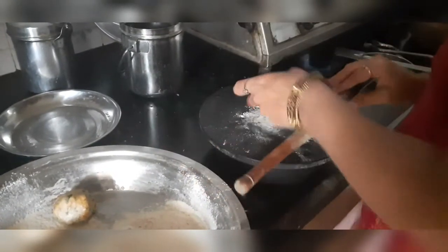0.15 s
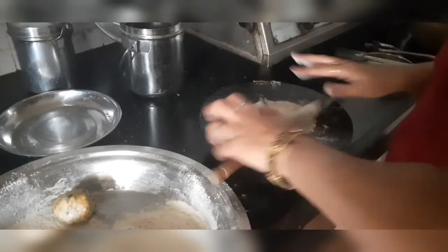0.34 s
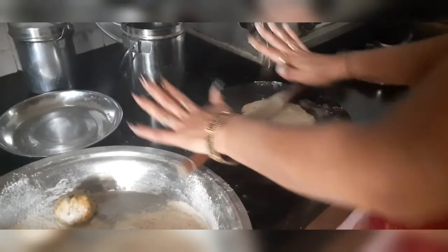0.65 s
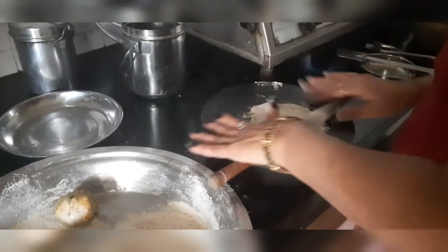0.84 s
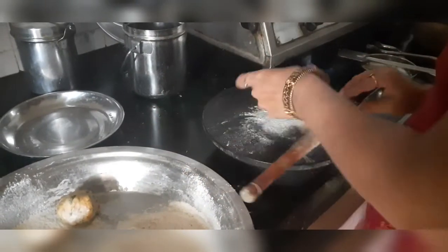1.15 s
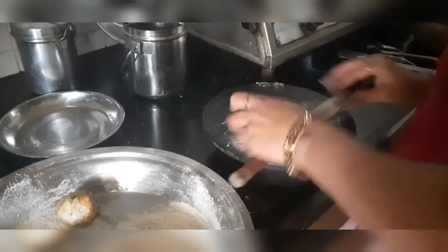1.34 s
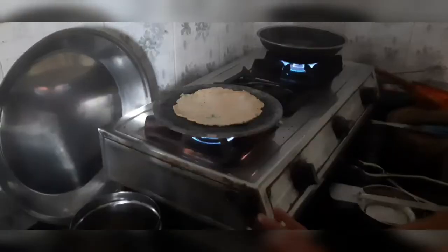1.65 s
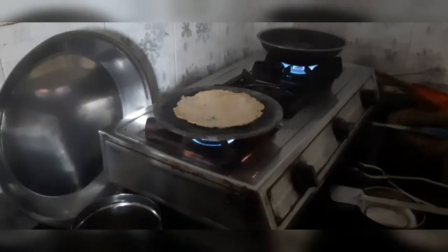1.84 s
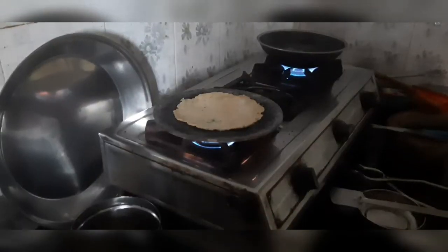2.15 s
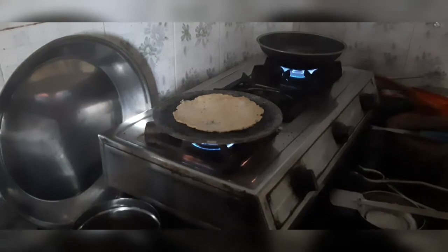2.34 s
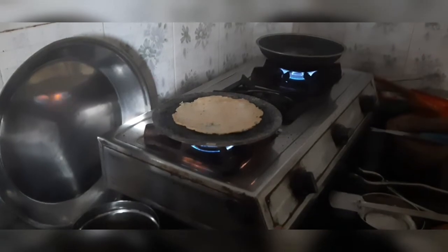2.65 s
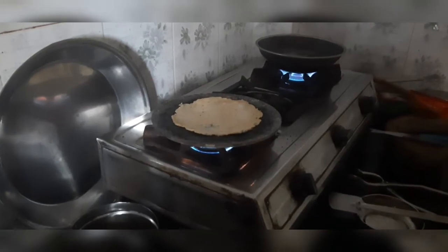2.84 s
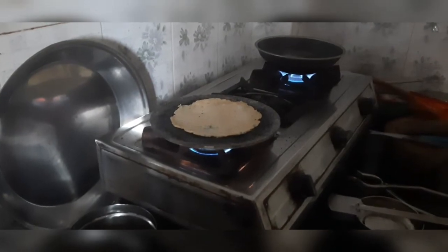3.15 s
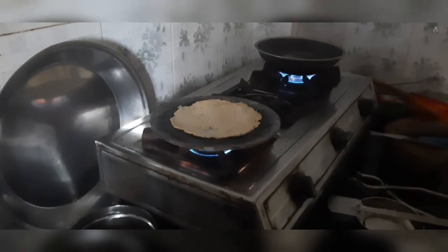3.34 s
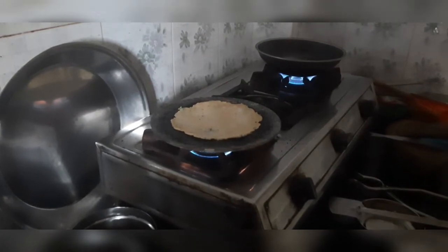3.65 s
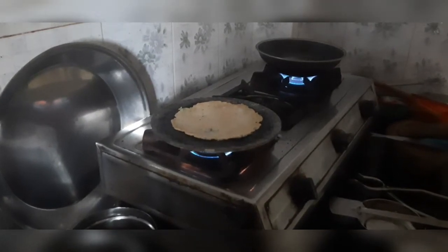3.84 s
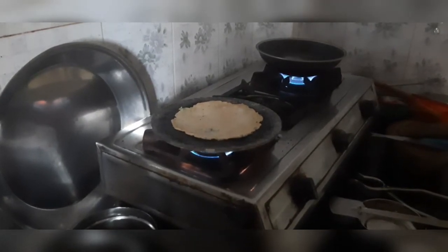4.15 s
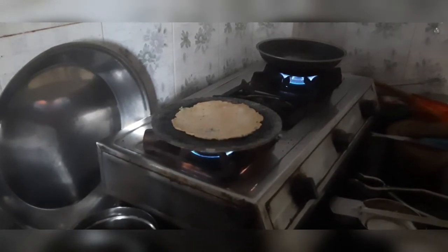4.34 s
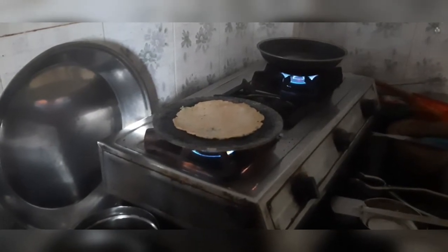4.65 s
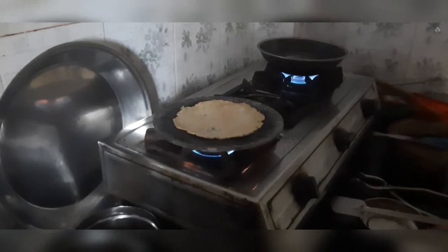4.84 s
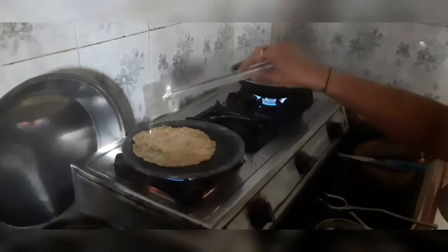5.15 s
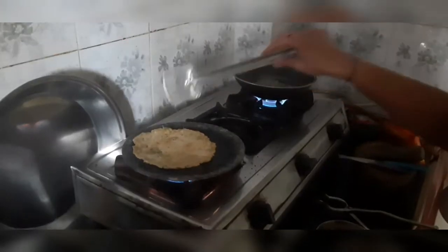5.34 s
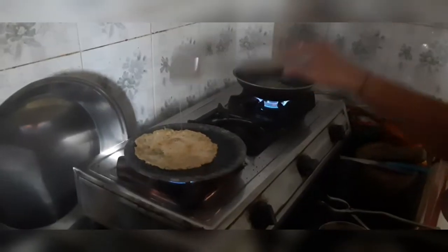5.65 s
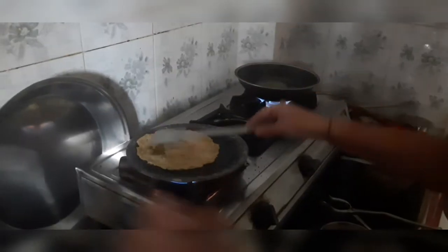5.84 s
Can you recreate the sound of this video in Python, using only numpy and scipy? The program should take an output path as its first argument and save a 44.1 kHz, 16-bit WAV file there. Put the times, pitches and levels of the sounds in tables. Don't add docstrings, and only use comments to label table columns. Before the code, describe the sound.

A small tiled kitchen, heard close on a modest stereo microphone with short hard echoes. From 0 to 1.4 seconds a wooden rolling pin works on a board: low lumpy rumbles, firm knocks at about 0.25 and 0.33, faint axle squeaks, a delicate bangle tick at 0.8, and a quick woody clatter at 1.3. Sound stops dead for a moment, then returns around 1.47 with gas burner hiss and a low flame boom that slowly strengthen. The pin lands heavily on the counter near 1.9 in several tight contacts, a sharp knock follows at 2.4, and a loud bunched clatter at 3.46. Around 4.4 come a low rumble and light taps, then a rough dragging rub from 4.55 to 4.85 and dry bumps by 4.9. Another tiny silence near 4.95; steady hiss resumes. At 5.4 tongs clang on an iron pan, rattling and ringing briefly; small ticks and a last gas puff end it.

```python
import sys
import numpy as np
from scipy import signal
from scipy.fft import rfft, irfft, next_fast_len
from scipy.io import wavfile

SR = 44100
rng = np.random.default_rng(int(sys.argv[2]) if len(sys.argv) > 2 else 0)


def magnitude_from_level(level_db):
    exponent = np.asarray(level_db, float) / 20
    return 10 ** exponent


def master_out(mix):
    frames = np.transpose(np.atleast_2d(mix))
    ceiling = np.clip(frames, -1, 1)
    pcm = np.round(ceiling * 32767).astype(np.int16)
    wavfile.write(sys.argv[1], SR, pcm)


N = 264144
CONTROL_STEP = 40


def rms_one(x):
    return x / np.sqrt(np.mean(x ** 2) + 1e-20)


def lookup(rows, hz, count=1):
    rows = np.array(rows, float)
    return np.interp(np.log(hz), np.log(np.maximum(rows[:, 0], 1)), rows[:, count])


def drift(rate):
    r = np.exp(-80 * np.pi * rate / SR)
    noise = rng.standard_normal(N // CONTROL_STEP + 2002)
    slow = signal.lfilter([1], [1, -2 * r, r * r], noise)[2000:]
    return np.interp(np.arange(N) / CONTROL_STEP, np.arange(len(slow)), rms_one(slow))


def resonance(x, hz, width_hz):
    r = np.exp(-np.pi * width_hz / SR)
    top = (1 - r * r) / 2
    return signal.lfilter([top, 0, -top], [1, -2 * r * np.cos(2 * np.pi * hz / SR), r * r], x)


def add(out, s, sound):
    at = round(s * SR)
    out[:, at:at + sound.shape[-1]] += sound[..., :N - at]


def left_right(difference_db):
    return magnitude_from_level(np.array([[.5], [-.5]]) * difference_db)


BAND_EDGES = 28 * 2 ** np.arange(0, 9.3, 1 / 2.5)
# (pitch [Hz], likeness [-1 to 1])
LIKENESS = [(60, 0.96), (110, 0.84), (200, 0.97), (380, 0.79), (700, 0.63), (1290, -0.15), (2380, 0.15),
            (4400, -0.078), (8120, -0.057), (15000, -0.0012)]
# (pitch [Hz], left minus right [dB])
SIDE_TILT = [(60, 3.5), (180, -2), (550, -0.5), (1650, -1), (4970, -2), (15000, 4.5)]


def noise_bands():
    white = rng.standard_normal((2, 2, N))
    for k, (low, high) in enumerate(zip(BAND_EDGES, BAND_EDGES[1:])):
        band_filter = signal.butter(2, [low, high], "band", fs=SR, output="sos")
        mid, side = signal.sosfilt(band_filter, white[k % 2])
        hz = np.sqrt(low * high)
        alike = np.clip(lookup(LIKENESS, hz), -1, 1)
        stereo = np.sqrt(1 + alike) * mid + np.sqrt(1 - alike) * side * [[1], [-1]]
        yield hz, left_right(lookup(SIDE_TILT, hz)) * stereo


# (time [s], hold [s],
# level [dB per Hz], centre [Hz])
STIRS = [(0.056, 0.046, -44, 257), (0.196, 0.15, -40, 237), (.25, 0.16, -65.5, 7000),
         (0.514, 0.11, -48.5, 247), (0.873, 0.17, -48.5, 264), (0.911, 0.016, -55.5, 5950),
         (0.907, 0.018, -59, 13500), (0.982, 0.03, -58.5, 2520), (1.255, 0.071, -50, 250),
         (1.275, 0.11, -63, 12000), (1.474, 0.018, -53.5, 980), (1.911, 0.0068, -42, 1110),
         (1.978, 0.09, -60.5, 1600), (1.991, 0.029, -63, 9250), (2.425, 0.089, -65, 10000),
         (2.43, 0.049, -57.5, 2900), (2.65, 0.22, -44.5, 310), (2.996, 0.034, -57.5, 7000),
         (3.46, 0.12, -55, 11000), (3.494, 0.064, -52, 350), (4.401, 0.12, -36.5, 130.5),
         (4.59, 0.058, -47.5, 9000), (5.22, 0.11, -61, 12100), (5.257, 0.021, -61, 263),
         (5.383, 0.045, -50, 300), (5.8, 0.19, -59, 600), (5.408, .04, -55.5, 11000),
         (2.492, .015, -59.5, 2000), (.8, 0.089, -60.5, 1150), (1.52, 0.013, -76, 2500)]


def stirs(t):
    rise_db_per_s, fall_db_per_s = 597, 182
    s, hold, level_db = np.transpose(STIRS)[:3, :, None]
    rise = rise_db_per_s * np.maximum(s - t, 0)
    fall = fall_db_per_s * np.maximum(t - s - hold, 0)
    return magnitude_from_level(level_db - rise - fall) ** 2


# (pitch [Hz], level [dB per Hz])
KITCHEN_COLOURS = [
    [(18, -44), (30, -4), (227, 5.5), (328, -3.5), (374, 7), (461, -23), (632, -11), (913, -14.5),
     (988, -22.5), (2610, -13), (5450, -16.5), (8520, -18), (9970, -23.5), (13700, -8.5), (16000, -35.5)],
    [(18, -43), (30, -0.5), (70, -8), (103, -4), (145, -1.5), (174, -48), (204, -2), (364, -7), (616, -20),
     (889, -11), (1190, -14), (2680, -16.5), (9460, -19.5), (14800, -14.5), (16000, -27)],
    [(18, -52), (30, -20), (103, -10), (303, -6), (740, -29), (889, -12), (1010, -14), (1390, -4.5),
     (1860, -15.5), (2540, -11.5), (3980, -17), (8080, -13), (10200, -5), (12000, -18.5), (16000, -2)],
]
MOMENT_LEVELS = [
    -50.5,
    -47.5,
    -51,
]
# (time [s], level [dB])
BACKGROUND_SWING = [
    [(0, -68.5), (.7, -68.5), (1.39, -68.5)],
    [(1.47, -72), (1.65, -73.5), (2.35, -71.5), (2.65, -69), (3.1, -66), (3.7, -65), (4.4, -64.5),
     (4.95, -63.5)],
    [(5.025, -65), (5.15, -66), (5.75, -66.5), (5.99, -65)],
]
# (pitch [Hz], share [ratio])
SWING_SHARE = [(250, 1.4), (1500, 1.51), (6500, 1.85), (12500, 1.84)]
# (start [s], end [s])
SILENCES = [
    (1.3914, 1.4665),
    (4.949, 5.0222),
]


def background_gain(hz, together, patchy_db):
    skirt_db_per_octave = 8
    t = np.arange(0, N + CONTROL_STEP, CONTROL_STEP) / SR
    floor_db = np.zeros(len(t))
    starts = [0] + [start for start, _ in SILENCES]
    for rows, colour, level_db, start in zip(BACKGROUND_SWING, KITCHEN_COLOURS, MOMENT_LEVELS, starts):
        s, swing_level_db = np.transpose(rows)
        later = t >= start
        swing_db = np.interp(t[later], s, swing_level_db - swing_level_db.mean())
        floor_db[later] = level_db + lookup(colour, hz) + lookup(SWING_SHARE, hz) * swing_db
    octaves_away = np.abs(np.log2(hz / np.array(STIRS)[:, 3]))
    skirts = magnitude_from_level(-skirt_db_per_octave * octaves_away) ** 2
    gain = np.interp(np.arange(N) / SR, t, np.sqrt(magnitude_from_level(floor_db) ** 2 + skirts @ stirs(t)))
    lumpy_db = patchy_db * (1 + 2.8 * (hz < 600))
    return gain * magnitude_from_level(lumpy_db * (1.08 * together + drift(7.3)))


# (pitch [Hz], width [Hz], level [dB])
BOOMS = [(100.8, 2.6, -62.5), (142.7, 4.6, -67.5)]


def hum():
    booms = 0
    for hz, width, db in BOOMS:
        tone = rms_one(resonance(rng.standard_normal(N), hz, width))
        booms = booms + magnitude_from_level(db + 2.5 * drift(7)) * tone
    swell_db = np.interp(np.arange(N) / SR, [1.4, 1.5, 2.4, 3.4, 4.95, 5.01],
                         [-8.0, -14, -9.5, -3.0, 7.5, -12.5])
    return booms * magnitude_from_level(swell_db)


# (pitch [Hz], width [Hz], level [dB])
BURNER_BANDS = [(916, 160, -75), (1567, 91, -70.5), (2615, 260, -71), (10920, 230, -70.5)]


def flame_bands():
    noise = rng.standard_normal((2, N))
    bands = 0
    for hz, width, db in BURNER_BANDS:
        bands = bands + magnitude_from_level(db + 2.2 * drift(3.7)) * rms_one(resonance(noise, hz, width))
    height_db = np.interp(np.arange(N) / SR, [2.3, 2.7, 3.5, 4.95, 5.0], [-12.5, -3.0, 1, 0.5, -24])
    return bands * magnitude_from_level(height_db)


def blow_db(hz, peak_db, bass_db, bright_db):
    octaves = np.log2(hz / 400)
    return peak_db + np.where(octaves > 0, bright_db * octaves, -bass_db * octaves)


def strike(blows, modes, spread_db, trim_db, wobble_db, pan_db):
    hz, mode_db, t60 = np.transpose(modes)[:, :, None]
    out = np.zeros((2, N))
    t = np.arange(round(t60.max() * SR)) / SR
    alternate = (-1) ** np.arange(len(hz))[:, None]
    gap = np.arccos(np.clip(lookup(LIKENESS, hz), -1, 1)) * 0.95 * alternate
    waver = np.array([np.interp(t * 55, np.arange(64), row) for row in rng.standard_normal((len(hz), 64))])
    fade = magnitude_from_level(-60 * t / t60 + wobble_db * waver * np.minimum(t / 0.012, 1))
    rings = fade * (1 - np.exp(-t * hz * 0.97))
    pairs = np.array([rings * np.sin(2 * np.pi * hz * t + side * gap) for side in (.5, -.5)])
    lucks = rng.standard_normal((len(blows), len(modes), 1))
    for (s, peak_db, bass_db, bright_db, _), luck in zip(blows, lucks):
        tilt_db = blow_db(hz, peak_db, bass_db, bright_db)
        height = magnitude_from_level(tilt_db + mode_db + trim_db + spread_db * luck)
        add(out, s, np.sum(pairs * height, axis=1) * left_right(pan_db))
    return out


# (time [s], peak [dB], bass [dB per octave], brightness [dB per octave], room [dB])
KNOCKS = [
    [(.09, -46, -5, -4, 4.5), (.216, -47.5, 3.5, -1.5, 6), (.2515, -31.5, -0.5, 2.5, -0.5),
     (.335, -34, 7.5, -26, -5), (.90, -54.5, 3, -40, 19.5), (.95, -55, 8.5, 5.5, 0),
     (1.023, -47.5, 5.5, -2.5, 1)],
    [(1.225, -49.5, 6.5, -34, 7), (1.296, -27, -11, -8, -10), (1.302, -36, 10, 1.5, -7),
     (1.307, -24, -15, -1, 4.5), (1.311, -30, -1, -17.5, -10)],
    [(2.392, -54, 2, -3.5, 1), (2.4213, -28.5, 3.5, 3, -4.5), (2.492, -45, 4.5, -0.5, 6.5)],
    [(3.449, -41.5, 6, 2, 3.5), (3.459, -31.5, -22, 0.5, -11), (3.4645, -33, -9.5, 2.5, -10.5),
     (3.4705, -20, -0.5, 4.5, -8.5)],
]
# (pitch [Hz], time to fade 60 dB [s], level at each of the four places [dB] x 4)
BOARD = [(145.4, 0.46, -16, -26.5, -24, -19), (222, 0.2, 1.5, -5, -17, -13.5),
         (250.4, 0.23, -7.5, -6, -13, -17.5), (432.7, 0.22, -23, -17, -9.5, -11),
         (389, .2, -7.5, -7, -1, -8), (368, 0.089, -17, -10, -2, -2), (318, 0.099, -19, -17, -10, -6),
         (567, 0.2, -13.5, -36, -33, -13.5), (849, 0.043, 0.5, -4, -13, -8.5),
         (889, .2, -20, -13, -28, -16), (1502, 0.058, -10.5, 3.5, -18.5, -11.5),
         (1562, .25, -29, -23, -30, -16), (1790, 0.023, -7.5, -3, -13, -12),
         (2420, .14, -37, -14, -24, -32), (2500, 0.019, -31, -2.5, -17, -22),
         (2685, .03, -34, -15, -14, -21), (2610, .14, -39, -22, -35, -26),
         (2910, 0.019, -28, -17, -15.5, -19.5), (3204, 0.024, -21, -35, -16.5, -19.5),
         (3380, 0.08, -30, -28, -20, -38)]
PLACE_SIDES = [1.2, 0.7, -2.4, -0.41]


def board():
    modes = np.array(BOARD)
    longest_cycles = 110
    modes[:, 1] = np.minimum(modes[:, 1], longest_cycles / modes[:, 0])
    out = 0
    for place, blows in enumerate(KNOCKS):
        here = modes[:, [0, 2 + place, 1]]
        out = out + strike(blows, here, spread_db=1.5, trim_db=-5.5, wobble_db=3, pan_db=PLACE_SIDES[place])
    return out


def walls(x):
    t60_s, level_db = 0.45, -26
    t = np.arange(round(t60_s * SR)) / SR
    noise = rng.standard_normal((2, SR))[:, :len(t)]
    bass = signal.butter(2, 250., fs=SR, output="sos")
    noise = noise + signal.sosfilt(bass, noise[0] - noise)
    dull = signal.sosfilt(signal.butter(2, 1800., fs=SR, output="sos"), noise)
    echoes = dull + (noise - dull) * magnitude_from_level(-90 * t)
    echoes = echoes * magnitude_from_level(level_db - 60 * t / t60_s) * (t > .004)
    return signal.fftconvolve(x, echoes, axes=1)[:, :N]


# (time [s], peak [dB], pitch [Hz], time to fade 60 dB
# [s], crack [dB])
TICKS = [(.8206, -62, 2285, 0.25, 4), (.8212, -63, 1170, .15, -9), (.8215, -65, 12500, .06, -3),
         (.8211, -64, 7000, 0.06, 3), (.2371, -50, 870, .05, -25), (2.3921, -53, 930, .05, -18),
         (2.4921, -51, 930, .05, -14), (2.4961, -55, 2300, .05, -9), (2.4941, -54, 1600, .05, -12),
         (2.3925, -58, 1600, .05, -20), (.9121, -65.5, 13600, 0.06, -5), (.9201, -60.5, 8300, 0.058, -2),
         (.9281, -60.5, 4480, 0.045, -2), (.9291, -61, 3500, .04, -9), (1.0021, -62, 3100, .07, -6),
         (1.7516, -64, 13100, .0101, 0.6), (2.0101, -65, 7930, 0.032, 4.1),
         (2.4223, -51.5, 5800, 0.026, 4.2), (3.4706, -42, 3000, .015, -2), (3.4708, -44, 2300, .03, -9),
         (3.4713, -47.6, 5000, .0301, 5), (5.0761, -62.1, 12000, .0201, -7.1), (5.4028, -51, 6800, 0.04, 2),
         (5.4035, -53, 7500, 0.11, -3), (5.4051, -60, 9600, .08, -9), (5.5075, -58.5, 11500, .0501, 2.5),
         (5.5721, -59.6, 13000, .0201, 2.1), (5.8987, -58.6, 13100, 0.0251, 4.4)]
# (time [s], half length [s], pitch [Hz], width [Hz], level [dB])
SQUEAKS = [
    (0.172, 0.065, 13500, 500, -68),
    (0.563, 0.07, 13600, 500, -69),
    (1.003, 0.076, 13550, 300, -63),
    (5.987, 0.047, 13200, 5000, -49),
]


def ticks_and_squeaks():
    out = np.zeros((2, N))
    t = np.arange(round(.15 * SR)) / SR
    for s, peak_db, hz, t60, crack_db in TICKS:
        noise = rng.standard_normal((2, len(t)))
        ring = rms_one(resonance(noise, hz, hz / 45))
        crack = np.diff(noise, prepend=0) * magnitude_from_level(crack_db - 60 * t / 0.024)
        add(out, s, magnitude_from_level(peak_db) * (ring * magnitude_from_level(-60 * t / t60) + crack))
    for s, half, hz, width, db in SQUEAKS:
        swell = np.hanning(round(2 * half * SR))
        squeak = rms_one(resonance(rng.standard_normal((2, len(swell))), hz, width))
        add(out, s - half, magnitude_from_level(db) * swell * squeak)
    return out


def close_by(blows, modes):
    return strike(blows, modes, spread_db=1, trim_db=-2, wobble_db=0, pan_db=0)


# (time [s], peak [dB], bass [dB per octave], brightness [dB per octave], room [dB])
BANGLE_HITS = [
    (.8202, -55, .1, .1, -20),
    (.8262, -55, .1, .1, -20),
]
# (pitch [Hz], level [dB], time to fade 60 dB [s])
BANGLE = [(2295, -2, .12), (2240, -4, .1), (7000, -8, .05)]


def bangle_clinks():
    return close_by(BANGLE_HITS, BANGLE)


# (time [s], peak [dB], bass [dB per octave], brightness [dB per octave], room [dB])
THUDS = [
    (1.862, -72, -26.5, 0, 16),
    (1.8925, -23.5, 2, -12.5, -5),
    (1.898, -31, -3.5, -2.5, 5),
    (1.904, -43, -2, -14, -3),
    (1.9099, -23.5, 1, -1.5, -4.5),
    (1.9149, -22, -11, 0, -13),
    (1.934, -38.5, -10, 0, -7),
    (1.963, -38, -15, -0.5, -6),
    (1.99, -44, -8, -1, 0),
]
# (pitch [Hz], level [dB], time to fade 60 dB [s])
COUNTER = [(167.8, -11.5, 0.22), (98.7, -13, 0.33), (145.1, -10.5, 0.42), (250, -18, 0.45),
           (350.8, -12.5, 0.21), (370, -10, 0.15), (439, -22, 0.27), (579, -15, 0.21), (689, -8, 0.28),
           (790, -23, .25), (899, -1.5, 0.056), (911, -13, .3), (1026, -21, 0.22), (1090, -24, 0.25),
           (1208, -18, 0.21), (1285, -12, .25), (1335, -17, .25), (1454, -30.5, 0.17), (1600, -26.5, 0.19),
           (1730, -20, .22), (1880, -23, 0.2), (2050, -21, .2), (1443, 13.5, 0.0082), (1740, 0.5, 0.023),
           (1946, 2, 0.013), (2254, -22, 0.15), (3040, -15.5, 0.025), (3480, -16, 0.046)]


def counter():
    return strike(THUDS, COUNTER, spread_db=2, trim_db=-5.5, wobble_db=3.5, pan_db=-0.7)


# (time [s], peak [dB], bass [dB per octave], brightness
# [dB per octave], room [dB])
TAPS = [
    (4.414, -33, 0.1, 0.1, -20),
    (4.471, -31.5, 0.1, 0.1, -24),
    (5.4012, -16, .3, .3, -20),
    (5.4152, -33, .3, .3, -20),
]
# (pitch [Hz], level [dB], time to fade 60 dB [s])
DRAWER = [(290, -1, .055), (230, -9, .05), (380, -12, .03)]


def drawer_taps():
    return close_by(TAPS, DRAWER)


# (time [s], level [dB])
SLIDE = [
    (4.538, -63),
    (4.574, -59.5),
    (4.594, -48.5),
    (4.666, -44),
    (4.85, -55.5),
    (4.858, -64.5),
    (4.943, -61.5),
]


def slide_db():
    s, level_db = np.transpose(SLIDE)
    return np.interp(np.arange(N) / SR, s, level_db, left=-120, right=-120)


# (pitch [Hz], width [Hz], level [dB])
SLIDE_RINGS = [(639, 14, -12.5), (834, 160, -2.5), (1077, 99, -7), (2594, 150, -8), (9600, 53, -29),
               (11000, 50, -31.5), (13000, 70, -18.5)]


def slide_rings():
    noise = rng.standard_normal((2, N))
    rings = sum(magnitude_from_level(db) * rms_one(resonance(noise, hz, width)) for hz, width, db in SLIDE_RINGS)
    return magnitude_from_level(slide_db()) * rings


# (time [s], peak [dB], bass [dB per octave], brightness [dB per octave], room [dB])
BUMPS = [
    (4.877, -35, 0.1, -9, -25),
    (4.9078, -28, 0.1, -1, -25),
]
# (pitch [Hz], level [dB], time to fade 60 dB [s])
CUPBOARD = [(100, -4, .14), (180, -5, .05), (330, -4, .035), (600, -6, .025)]


def cupboard_bumps():
    return close_by(BUMPS, CUPBOARD)


# (time [s], peak [dB], bass [dB per octave], brightness [dB per octave], room [dB])
CLANGS = [
    (5.4011, -23, 1, 1.9, -7.5),
    (5.408, -23.5, -7, -5, 0),
    (5.417, -24, -4.5, -7.5, 8.5),
    (5.444, -30, -15, -1.5, -25),
]
PAN_HZ = [145, 267, 226, 288, 325, 389, 451, 517, 583, 651, 619, 935, 982, 1125, 1675, 1720, 1803, 1938,
          2460, 2485, 2562, 3036, 5373, 7402]
# (level [dB], time to fade 60 dB [s])
PAN = [(-52, 0.68), (-7, 0.26), (-7, 0.62), (-1, 0.49), (-20, 0.31), (-39, 0.42), (-17, 0.26), (4, 0.37),
       (-12.5, 0.42), (-2.5, 0.29), (-1, 0.22), (-14, 0.26), (-8, 0.26), (-20, 0.15), (-19.5, 0.41),
       (-18, 0.32), (-17, 0.41), (-24, 0.26), (-26, 0.4), (-7, 0.1), (-27, 0.26), (-27, 0.37), (-34, 0.11),
       (-29, 0.12)]


def iron_pan():
    modes = np.column_stack([PAN_HZ, PAN])
    return strike(CLANGS, modes, spread_db=1, trim_db=-7.5, wobble_db=1, pan_db=-1.5)


# (time [s], peak [dB], bass [dB per octave], brightness [dB per octave], room [dB])
CHATTER = [
    (5.424, -41, .1, .1, -20),
    (5.459, -43, .1, .1, -20),
    (5.487, -43.5, .1, .1, -20),
]
# (pitch [Hz], level [dB], time to fade 60 dB [s])
RIM = [(2464, -6, 0.33), (2500, -14, 0.33), (1834, -2, 0.26), (1717, -9, 0.24), (3036, -10, .22)]


def tong_chatter():
    return close_by(CHATTER, RIM)


# (pitch [Hz], level [dB], time to fade 60 dB [s])
ROOM = [(59.7, -19.5, 0.44), (156, -5, 0.57), (295, 2.5, 0.51), (724, -14, 0.63), (1470, -19.5, 0.58),
        (2170, -23.5, 0.6), (5000, -28.5, 0.13), (9160, -41, 0.2), (15000, -61.5, 0.089)]


def echo_gain(hz):
    blows = np.array(sum(KNOCKS, THUDS + BUMPS + CLANGS))
    power = np.full(N, 1e-18)
    level_db = blow_db(hz, *blows[:, 1:4].T) + blows[:, 4] + lookup(ROOM, hz) + 1.5
    power[np.round(blows[:, 0] * SR).astype(int)] = magnitude_from_level(level_db) ** 2
    fall = magnitude_from_level(-120 / (lookup(ROOM, hz, count=2) * SR))
    rise = np.exp(-hz / (3.0 * SR))
    return np.sqrt(signal.lfilter([1 - rise], np.convolve([1, -fall], [1, -rise]), power))


def unbroken():
    t = np.arange(N) / SR
    times = np.array(sum(KNOCKS, THUDS + CLANGS))[:, 0]
    return np.prod([(t < start) | (t >= times[times > start].min()) for start, _ in SILENCES], axis=0)


# (pitch [Hz], level [dB per Hz])
SLIDE_COLOUR = [(120, -33), (200, -27), (294, -0.5), (671, -4.5), (1080, -6), (1300, -6.5), (1420, 1),
                (2700, -14), (3130, -9.5), (12800, -24.5), (16000, -47)]


def air():
    out = 0
    together = drift(9.6)
    stroke = magnitude_from_level(slide_db() + 10.5 + 1.1 * drift(61))
    alive = unbroken()
    for hz, band in noise_bands():
        friction = stroke * magnitude_from_level(lookup(SLIDE_COLOUR, hz))
        background = background_gain(hz, together, patchy_db=0.65)
        power = background ** 2 + alive * echo_gain(hz) ** 2 + friction ** 2
        out = out + band * np.sqrt(power)
    return out


def scene():
    wood = board() + counter()
    iron = iron_pan()
    echoes = walls(magnitude_from_level(-11.0) * wood + magnitude_from_level(-10.0) * iron)
    dry_blows = bangle_clinks() + drawer_taps() + cupboard_bumps() + tong_chatter()
    blows = (wood + iron + echoes + dry_blows) * unbroken()
    return air() + hum() + flame_bands() + blows + ticks_and_squeaks() + slide_rings()


# (pitch [Hz], level [dB])
MICROPHONE = [(25, -31.5), (45, 0), (800, -0.5), (950, 2), (1250, -2), (1600, -0.5), (2000, 2.5), (2600, 2),
              (8800, -0.5), (10100, -6), (10700, -2), (11500, -1.5), (15750, -2), (15900, -52)]


def microphone(dry):
    size = next_fast_len(N)
    hz = np.maximum(np.arange(size // 2 + 1) * SR / size, 1)
    return irfft(rfft(dry, size) * magnitude_from_level(lookup(MICROPHONE, hz)), size)[:, :N]


def low_pass(x):
    return signal.sosfilt(signal.butter(12, 16410, fs=SR, output="sos"), x)


def record(dry):
    t = np.arange(N) / SR
    on = np.prod([(t < start) | (t >= stop) for start, stop in SILENCES], axis=0)
    return low_pass(microphone(dry) * on)


dry = scene()
out = record(dry)
master_out(out)
```